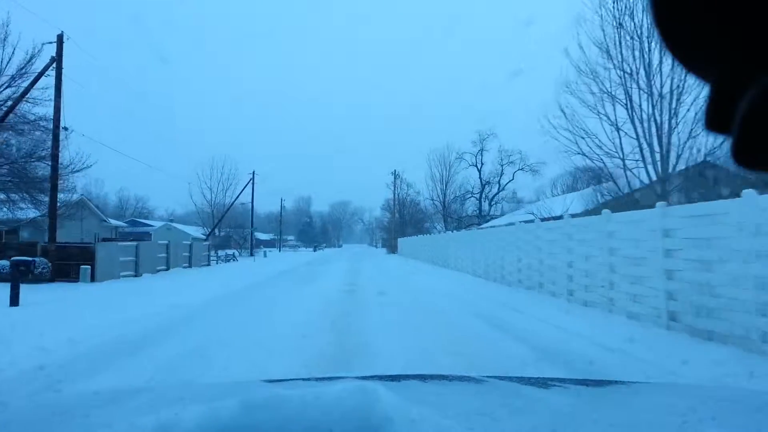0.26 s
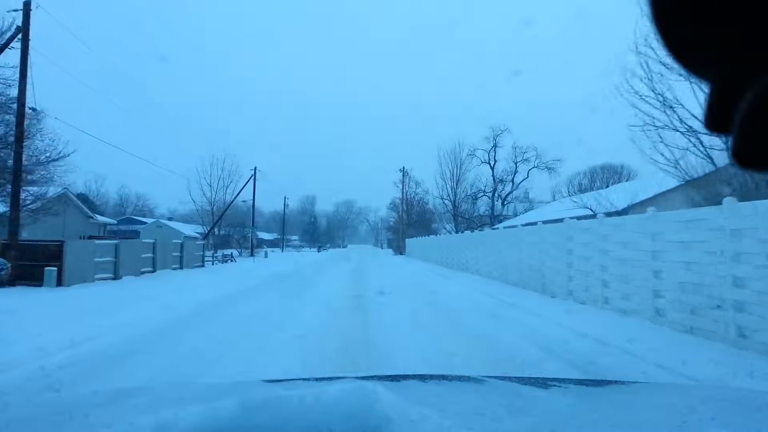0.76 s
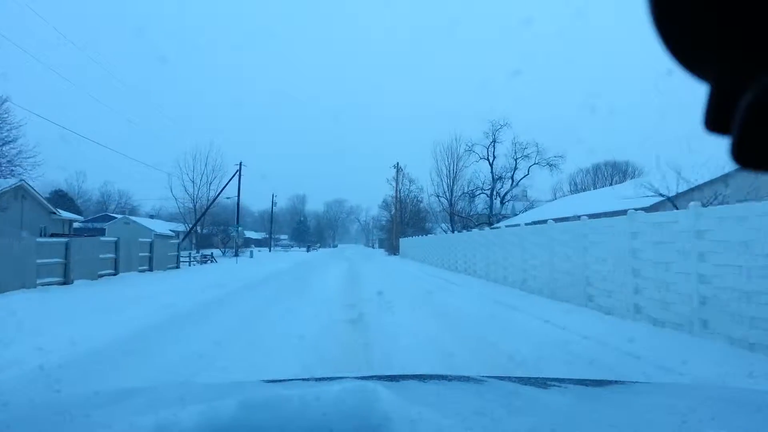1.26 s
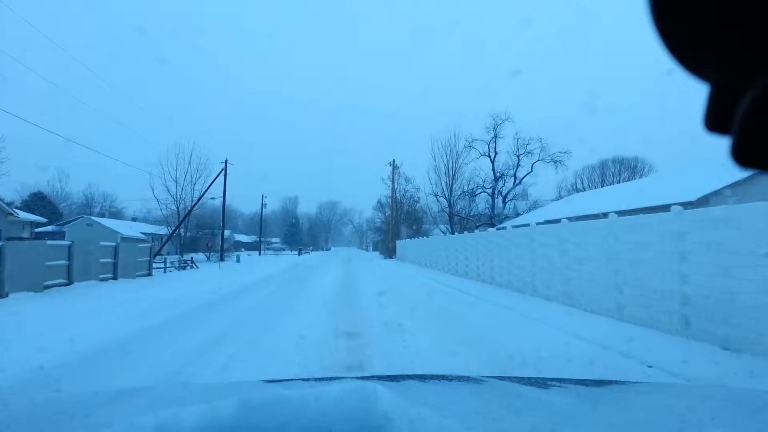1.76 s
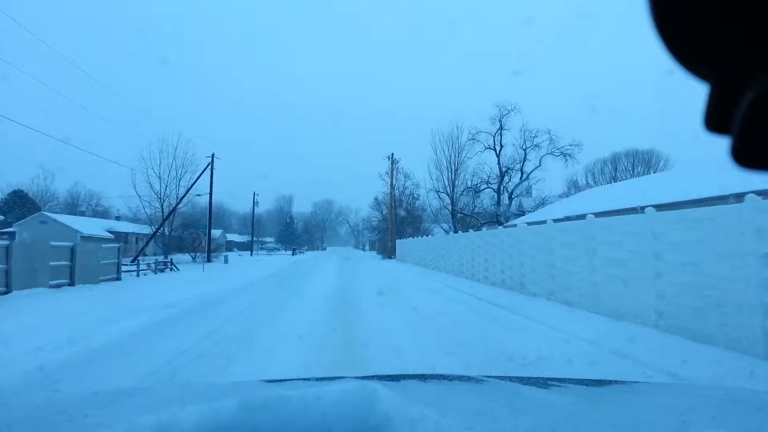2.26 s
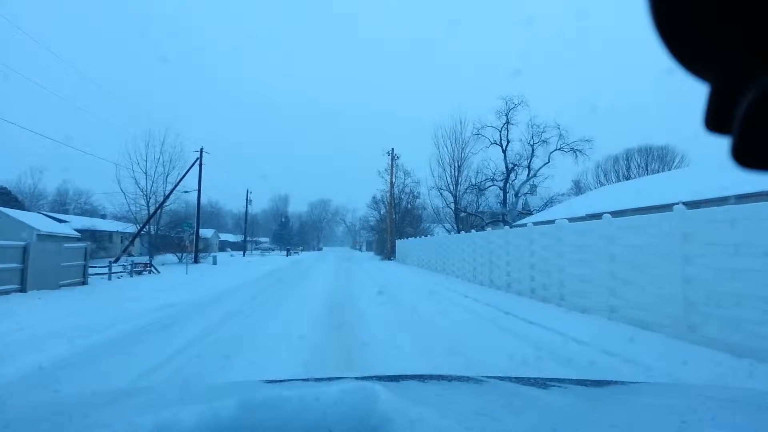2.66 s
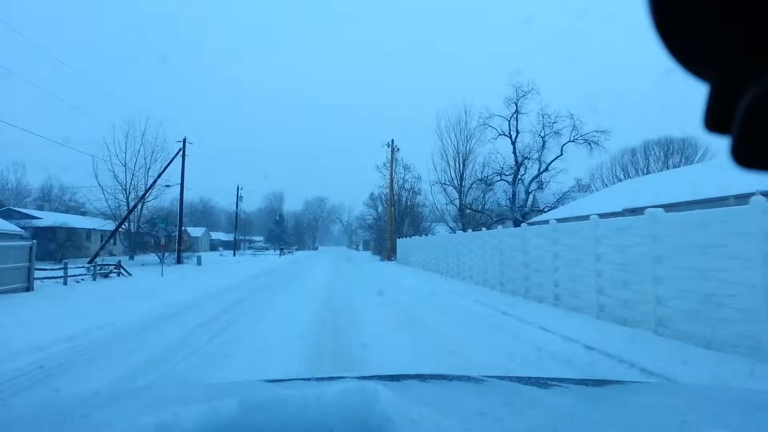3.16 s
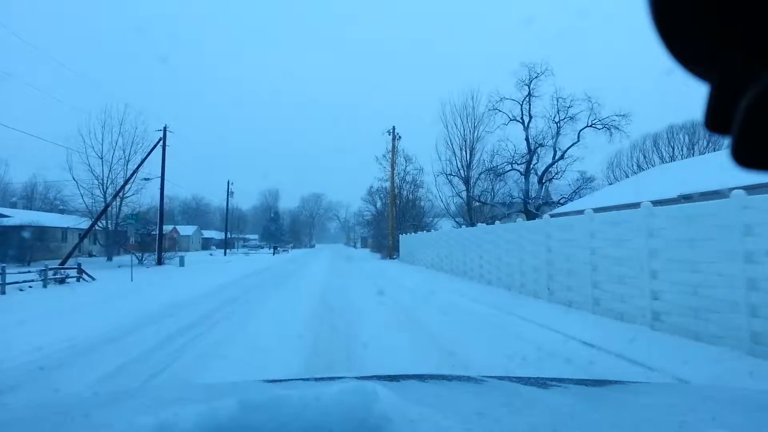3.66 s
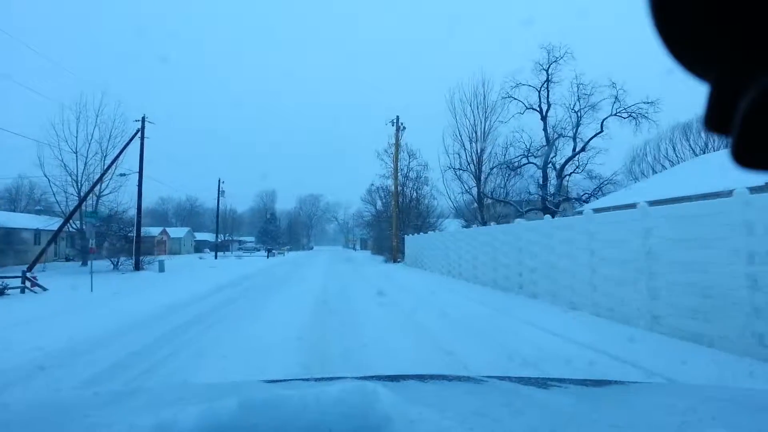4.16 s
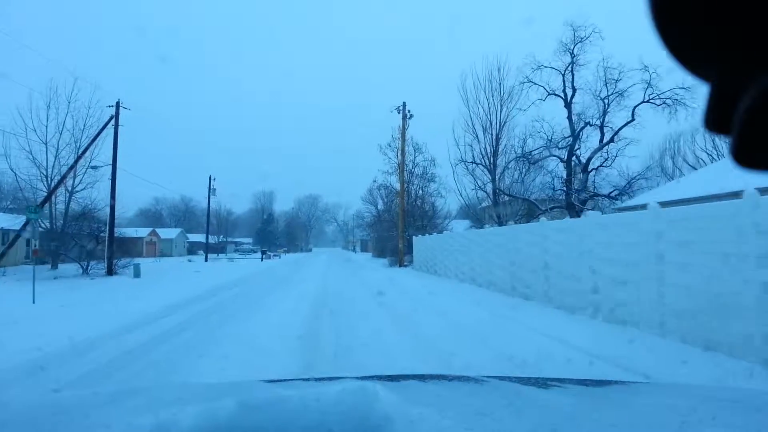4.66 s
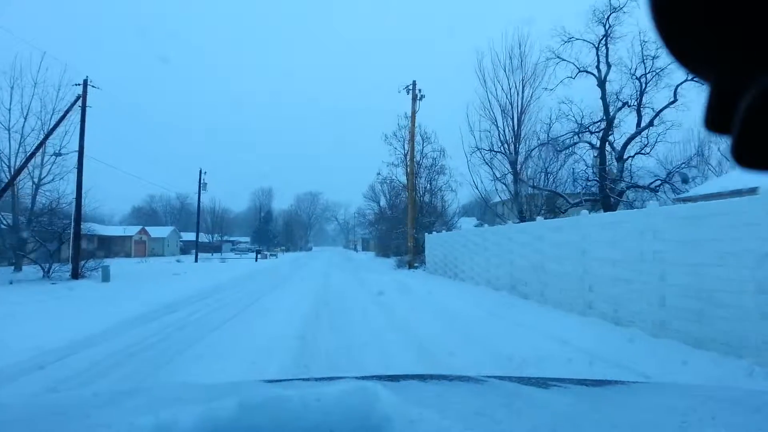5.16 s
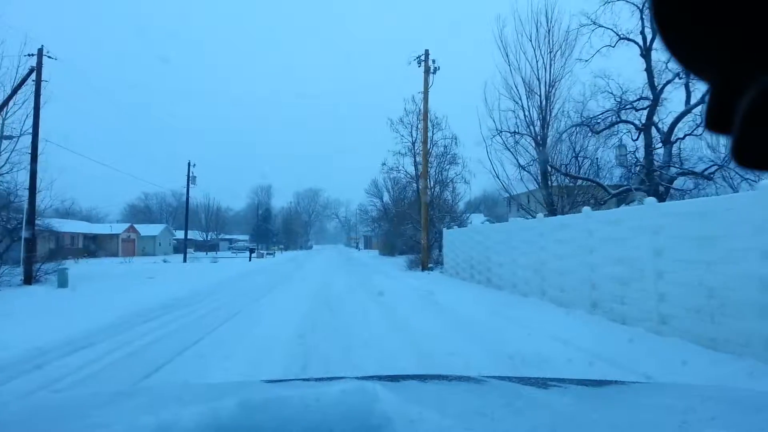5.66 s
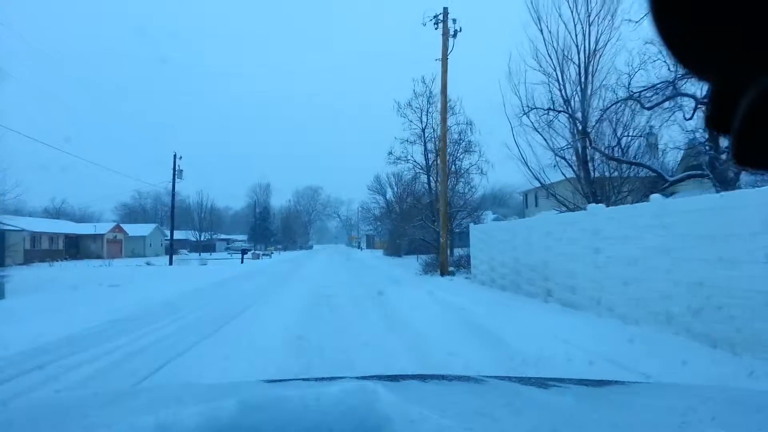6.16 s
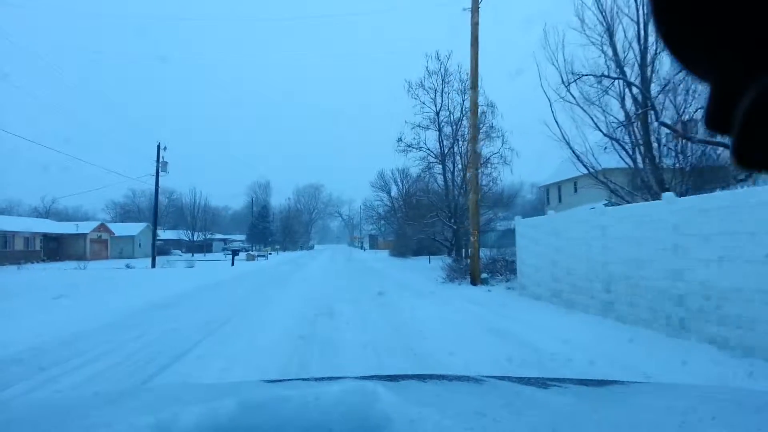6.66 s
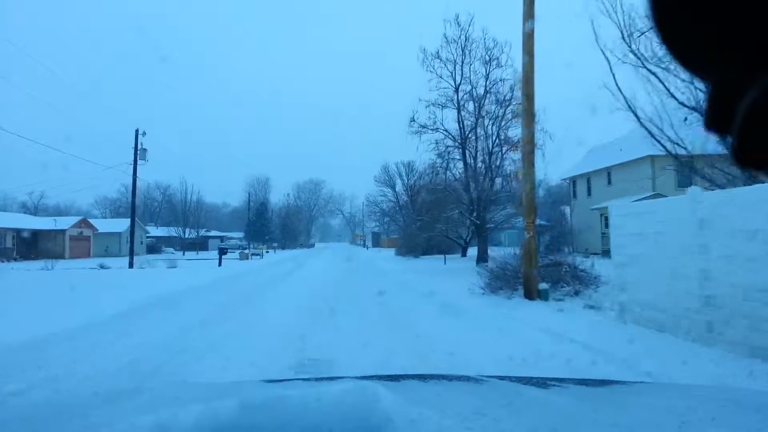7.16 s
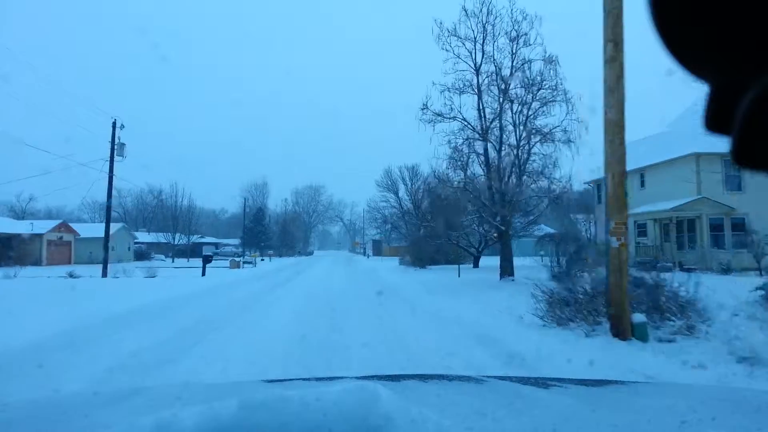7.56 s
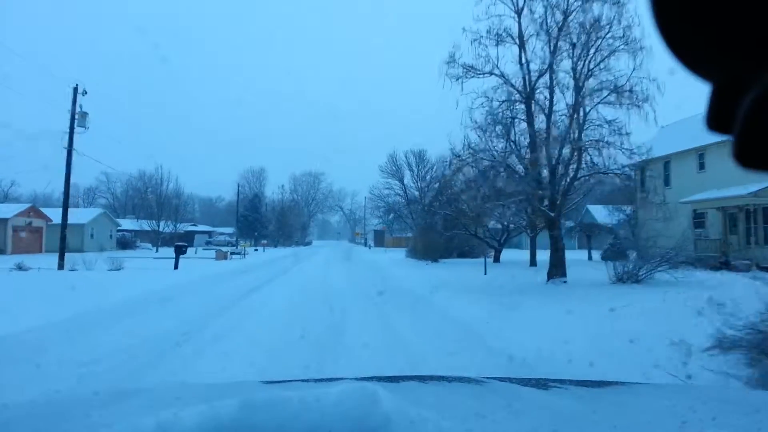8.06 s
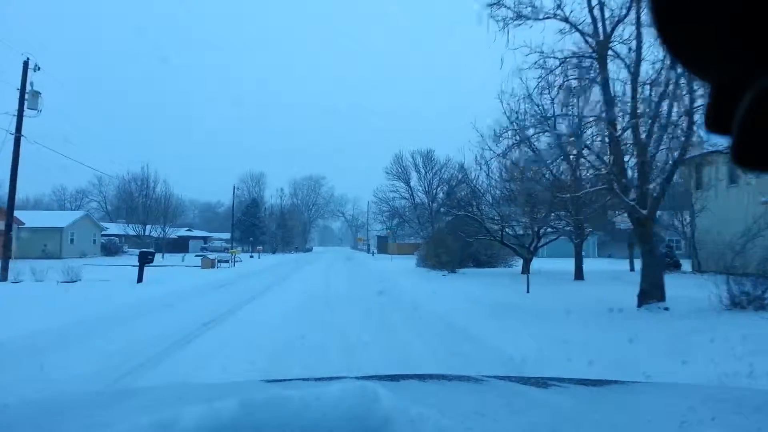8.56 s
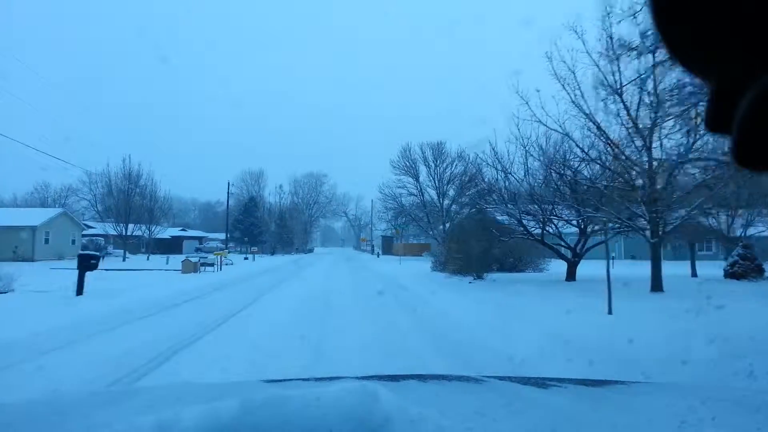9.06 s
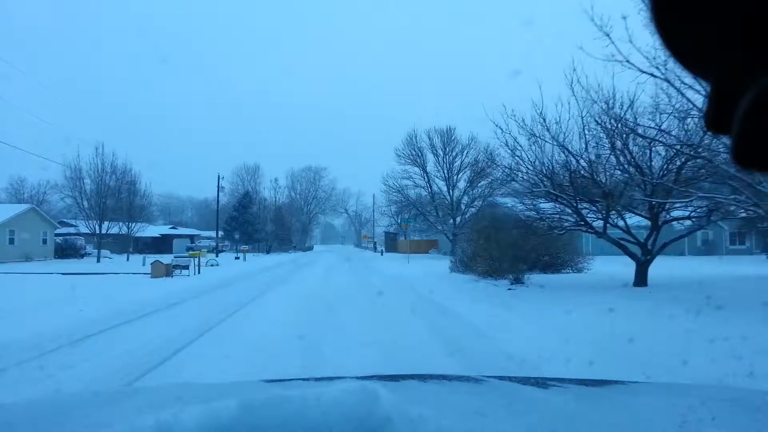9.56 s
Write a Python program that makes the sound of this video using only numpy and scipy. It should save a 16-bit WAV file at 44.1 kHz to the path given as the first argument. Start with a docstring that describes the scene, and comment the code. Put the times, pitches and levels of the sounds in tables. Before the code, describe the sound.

Inside a pickup cab on a snow-covered street, close and boomy. From 0 s a loud open-exhaust V8 throbs low and unevenly, nearly steady for the first second, over packed-snow tyre rumble, mid-range body buzz and faint fan hiss. Between 0.25 and 0.6 s there are ticks, a few panel knocks, and a quick bright scuff and scrape of plastic trim; loose snow sweeps softly near 1 s. The drone then climbs slowly and continuously, its resonances shifting. Near 3 s a rut brings a thud, short squeak, snow swish and a cluster of rattles. Knocks return after 4 s and become dense from 5 to 6 s, with a strong thud at 5.1. Rattling continues less regularly, with thuds near 6.2, 7 and 7.4 s and snow swishes around 7 and 8. Sharp knocks come at 9 s, a last thud at 9.45, then the throttle lifts and the exhaust eases until the end at 9.8 s.

```python
"""Inside the cab of a pickup with an open exhaust on a snowy street, slowly gaining speed after the first second.
A V8 with uneven firing per bank sounds multiples of the engine cycle, lifted at pipe and cab resonances.
Throughout, filtered noise makes tyre rumble, body buzz and fan hiss; decaying modes make the knocks of a loose panel.
From the first half second on come light ticks, a scuff and a scrape of the trim, then sweeps of loose snow;
from the third second a squeak and, over ruts, body thuds. At the end the throttle lifts."""
import sys
import numpy as np
from scipy import signal
from scipy.fft import rfft, irfft
from scipy.io import wavfile

SR = 44100
rng = np.random.default_rng(int(sys.argv[2]) if len(sys.argv) > 2 else 0)


def voltage_ratio(level):
    """Linear amplitude factor for a level in decibels (scalar or array-like)."""
    return 10 ** (np.asarray(level, float) / 20)


def pcm_store(signal):
    """Save signal as 16-bit PCM."""
    levels = np.round(np.clip(np.atleast_2d(signal), -1, 1) * 32767)
    wavfile.write(sys.argv[1], SR, levels.astype(np.int16).T)


N = 431738


def rms_one(x):
    """Scale to unit rms."""
    return x / np.sqrt(np.mean(x ** 2) + 1e-20)


def in_time(rows):
    """Curve of (seconds, value) rows, one value per sample."""
    s, value = np.transpose(rows)
    return np.interp(np.arange(N) / SR, s, value)


def drift(rate_hz):
    """Slow chance of spread 1: coarse noise through a double one-pole low-pass."""
    step, settle = 40, 2000   # samples per coarse value; coarse values dropped
    r = np.exp(-2 * np.pi * rate_hz * step / SR)
    coarse = rng.standard_normal(N // step + settle + 2)
    slow = signal.lfilter([1], [1, -2 * r, r * r], coarse)[settle:]
    return np.interp(np.arange(N) / step, np.arange(len(slow)), rms_one(slow))


def band(x, low_hz, high_hz):
    """Butterworth band-pass."""
    return signal.sosfilt(signal.butter(2, [low_hz, high_hz], "band", fs=SR, output="sos"), x)


def coloured_noise(spectrum, patchy_db, rate_hz):
    """White noise shaped to a spectrum, its level flickering; rms 1."""
    hz, db = np.transpose(spectrum)
    grid_hz = np.maximum(np.fft.rfftfreq(N, 1 / SR), 1)
    shape = voltage_ratio(np.interp(np.log(grid_hz), np.log(hz), db, left=-90, right=-90))
    noise = irfft(rfft(rng.standard_normal(N)) * shape, N)
    return rms_one(noise * voltage_ratio(patchy_db * drift(rate_hz)))


def fan(shake_db):
    """Heater fan: flickering broadband hiss, its level following a third of the shake."""
    # Each row: frequency in Hz, relative density in dB per Hz.
    hiss = [(1500, -28.5), (2000, -7), (3000, -7.5), (3800, -10), (5700, -20.5), (7300, -23), (9500, -25.5),
            (10600, -27.5), (12000, -31), (14600, -30.5), (15200, -56.5)]
    return voltage_ratio(-45 + 0.33 * shake_db) * coloured_noise(hiss, patchy_db=1.43, rate_hz=20)


def tyres(shake_db):
    """Tyres on packed snow: low rumble, its level following part of the shake."""
    # Each row: frequency in Hz, relative density in dB per Hz.
    rumble = [(40, -26), (60, -7), (80, -11.5), (120, -10.5), (160, -8.5), (220, -1), (285, .5),
              (340, -6.5), (420, -8.5), (500, -12.5), (620, -15), (750, -34)]
    return voltage_ratio(-17.5 + 0.4 * shake_db) * coloured_noise(rumble, patchy_db=0.7, rate_hz=31)


def body(shake_db):
    """Body buzz: mid-band noise, its level following the whole shake."""
    # Each row: frequency in Hz, relative density in dB per Hz.
    buzz = [(320, -38), (550, -14), (656, -1.5), (725, -6), (775, -5), (820, 0.5), (870, -1), (915, -4),
            (1010, -7.5), (1350, -12.5), (1600, -16), (1850, -19), (2600, -28), (3380, -60)]
    return voltage_ratio(-30 + shake_db) * coloured_noise(buzz, patchy_db=1.5, rate_hz=39)


def snow():
    """Loose snow sweeps along the floor pan: soft Gaussian swells of bright, patchy noise."""
    # Each row: centre in seconds, level in dB rms before the patchiness, half-length (to 1/e) in seconds.
    sweeps = [(1.055, -54, 0.23), (2.92, -51.5, 0.044), (3.36, -54.5, 0.16), (7.098, -53.5, 0.073),
              (7.97, -49.5, 0.046)]
    t = np.arange(N) / SR
    swell = sum(voltage_ratio(db) * np.exp(-((t - s) / half_s) ** 2) for s, db, half_s in sweeps)
    return swell * voltage_ratio(2.0 * drift(40)) * rms_one(band(rng.standard_normal(N), 2000, 8000))


def rub(s, db, hold_s, t60_s):
    """Envelope of a rub: fast attack up to s, hold, exponential release."""
    attack_db_per_s = 8000
    t = np.arange(N) / SR - s
    rise_db = attack_db_per_s * np.maximum(-t, 0)
    fall_db = 60 * np.maximum(t - hold_s, 0) / t60_s
    return voltage_ratio(db - np.minimum(rise_db + fall_db, 200))


def rubbing(scuff_top_db, grain_db):
    """Something brushes the trim: grainy noise with lingering treble; later a short sine squeak wavers."""
    # Each: time of full level in seconds, level in dB rms, hold in seconds, release t60 in seconds.
    scuff_row = (.4345, -32, .008, .06)
    squeak_row = (2.977, -25, .009, .06)
    squeak_hz, squeak_waver = 1045, 0.02
    white = rng.standard_normal((2, N))
    s, db, hold_s, t60_s = scuff_row
    scuff = rub(*scuff_row) * voltage_ratio(grain_db * drift(150)) * rms_one(band(white[0], 2100, 4000))
    scuff_top = rub(s, db + scuff_top_db, hold_s, 2.8 * t60_s) * rms_one(band(white[1], 5000, 13000))
    angle = 2 * np.pi * np.cumsum(squeak_hz * (1 + squeak_waver * drift(30))) / SR
    return scuff + scuff_top + rub(*squeak_row) * np.sqrt(2) * np.sin(angle)


def catches():
    """Something scrapes the trim in a quick run of catches, each ringing as a decaying sine."""
    # Each row: start in seconds, starting level in dB, frequency in Hz.
    catch_rows = [(.4337, -20.5, 3920), (0.436, -18.5, 2900), (.4375, -18, 2980), (.4407, -20, 4340),
                  (0.445, -27, 3230)]
    t60_s = 0.007
    out, t = np.zeros(N), np.arange(SR // 50) / SR
    for s, db, hz in catch_rows:
        i = int(s * SR)
        out[i:i + len(t)] += voltage_ratio(db - 60 * t / t60_s) * np.sin(2 * np.pi * hz * t)
    return out


def trim(gain_db, vary_db, rise_share):
    """Light plastic ticks: each rings the trim's modes anew and adds a short bright snap."""
    # Each row: start in seconds, level in dB before gain_db, snap in dB against that level.
    ticks = [(0.2497, -38.5, -2.5), (0.2828, -39, -34.5), (0.4065, -38, -15.5), (2.899, -31, -32.5),
             (2.9215, -39.5, -32), (2.9352, -29.5, -38), (2.9868, -33, -30), (3.119, -41, -30),
             (3.3285, -31.5, -34.5), (3.338, -37, -30.5), (3.4098, -36, -23), (3.5136, -35, -19.5),
             (4.0997, -39, -11), (4.5022, -36.5, -26), (4.793, -45.5, 2.5), (4.94, -36, -31),
             (5.0498, -38, -28), (5.178, -47, 4.5), (5.2526, -33.5, -38), (7.7862, -51, 1.5),
             (7.7978, -31, -26.5), (7.919, -46, -4), (7.9383, -32.5, -28), (7.9807, -34.5, -33),
             (8.137, -34.5, -36), (8.159, -42, -17), (8.17, -30.5, -29), (8.3272, -35, -35.5),
             (8.724, -51.5, 2.5), (8.9114, -48, -2.5), (8.9705, -32.5, -27), (9.03, -34, -39.5),
             (9.35, -40.5, -7)]
    # Modes of the trim. Each row: frequency in Hz, level in dB, t60 in seconds.
    modes = [(2900, -6, 0.0098), (4030, 2, 0.0074), (4800, -1.5, 0.0071), (5530, -5.5, 0.0065),
             (7150, -12.5, 0.0065)]
    snap_t60_s, detune = 0.015, 0.026
    chance = rng.standard_normal((len(ticks), len(modes)))
    out, t = np.zeros(N), np.arange(SR // 20) / SR
    rise = 1 - np.exp(-t / (rise_share * snap_t60_s))
    bright = rms_one(band(rng.standard_normal(N), 6500, 14500))
    for (s, tick_db, snap_db), chances in zip(ticks, chance):
        i = int(s * SR)
        ring = 0
        for (hz, db, t60_s), c in zip(modes, chances):
            decay = voltage_ratio(db + vary_db * c - 60 * t / t60_s)
            ring = ring + decay * np.sin(2 * np.pi * hz * (1 + detune * c) * t)
        snap = voltage_ratio(snap_db - 60 * t / snap_t60_s) * bright[i:i + len(t)]
        out[i:i + len(t)] += voltage_ratio(tick_db + gain_db) * rise * (ring + snap)
    return out


def panel(small_db, per_s, spread_db, vary_db, soft_hz, travel_s):
    """A loose panel: loud knocks at set times, small ones by chance, each striking the modes anew."""
    # Each row: start in seconds, strike level in dB, hardness as dB change of the modes above 1 kHz.
    knocks = [(0.2506, -8.5, 5), (0.3858, -17, -1), (0.4074, -8.5, -3), (0.4922, -17, 2),
              (0.615, -10.5, 3.5), (2.9241, -20, 9), (2.9361, -12, 1), (2.9946, -16, 0), (3.0279, -10, -3),
              (3.0744, -15, 1), (3.2878, -19, 5), (3.3022, -13.5, 4), (3.3444, -10, -2), (3.3571, -14, 0),
              (3.4043, -13, 3), (3.4178, -18, 3), (3.4257, -7.5, -9), (3.4747, -12, -8), (4.0392, -12, 6.5),
              (4.1003, -15, 2), (4.2724, -15.5, 4), (4.4441, -12.5, 3), (4.5032, -10, -1),
              (4.7154, -13, -1), (4.7315, -14, 2), (4.885, -14, 5.5), (4.9273, -9, -1), (4.9432, -6, -0.5),
              (4.9493, -20, 4), (5.013, -15, 3), (5.02, -11, -2), (5.0503, -8, 3), (5.1043, -8.5, 1),
              (5.1253, -13, -3), (5.1307, -5.5, -6), (5.1564, -13, -5), (5.1852, -13, -10),
              (5.2068, -9.5, -3), (5.2525, -9, -11), (5.2814, -8, -4), (5.3103, -9, -15), (5.3375, -9, 3),
              (5.3644, -9, 0), (5.4449, -10, 6.5), (5.4611, -16, 5), (5.5397, -8, 0), (5.566, -20, 10),
              (5.581, -10, 1.5), (5.6283, -10, -2), (5.6478, -13, -5), (5.6615, -21, 9), (5.6907, -11, -8),
              (5.713, -14, -1), (5.7385, -13, -3), (5.7797, -11, -8), (5.8053, -9, -2), (5.8317, -9, -2),
              (5.8423, -18, 6), (5.8601, -11, -4), (5.9244, -10.5, 0), (6.0428, -17, 4), (6.0799, -13, -7),
              (6.1336, -12, -8), (6.1672, -20, 6), (6.1822, -15, 3), (6.2543, -14, -2), (6.279, -8, -5),
              (6.293, -8, -8), (6.5678, -10.5, -2), (6.7022, -11, -5), (6.7431, -17, 6), (6.7574, -16, 4),
              (6.7722, -11.5, 1), (6.8574, -12, -7), (6.9552, -11, 0), (6.971, -18, 5), (7.0045, -9, -1),
              (7.0849, -23, 7), (7.118, -15, 2), (7.1827, -16.5, 9), (7.2166, -10, -7), (7.246, -13, -10),
              (7.2818, -13.5, 4.5), (7.2965, -16, 1), (7.4779, -13, -1), (7.5249, -11.5, 1),
              (7.6216, -17, 8.5), (7.654, -14, -1), (7.7009, -15, 3), (7.7346, -13, -1), (7.7687, -17, 2),
              (7.7828, -10, -4), (7.8124, -21, 8), (7.8597, -12.5, 2.5), (7.9419, -17, 1), (7.9552, -10, 0),
              (7.9731, -11, -4), (8.0177, -17, -7), (8.0329, -18.5, 14), (8.0999, -7.5, 1),
              (8.3301, -15, 4), (8.4884, -16, 2), (8.5205, -15, -4), (8.5343, -22, 7), (8.543, -11, -6),
              (8.6793, -16, 3), (8.7117, -13.5, 3), (8.865, -13, -4), (8.9715, -7.5, -5), (9.0311, -5.5, 4),
              (9.0712, -12.5, 6), (9.1185, -9, -1), (9.2874, -10.5, 4), (9.314, -13, -14),
              (9.3511, -8, 2.5), (9.3966, -10.5, 2)]
    # Modes of the panel. Each row: frequency in Hz, level in dB, t60 in seconds.
    modes = [(590, -16, 0.0071), (810, -2.5, 0.025), (1190, -21.5, 0.0047), (1342, -13, 0.01),
             (1790, -12, 0.0079), (2280, -17.5, 0.0025)]
    small = rng.random(N) < per_s / SR
    low = small * voltage_ratio(small_db + spread_db * np.minimum(rng.exponential(1, N), 3))
    high = low.copy()
    at_s, strike_db, hard_db = np.transpose(knocks)
    start = (at_s * SR).astype(int)
    low[start] = voltage_ratio(strike_db)
    high[start] = voltage_ratio(strike_db + hard_db)
    block = 64   # mode strengths are redrawn every 1.5 ms
    out, strengths = 0, rng.standard_normal((len(modes), N // block + 1))
    for k, (hz, db, t60_s) in enumerate(modes):
        r, w = voltage_ratio(-60 / (t60_s * SR)), 2 * np.pi * hz / SR
        gain = np.repeat(voltage_ratio(db + vary_db * strengths[k]), block)[:N]
        lag = int(travel_s * 1000 / hz * SR)   # bending waves: the lows arrive later
        strike = (-1) ** k * np.roll((high if hz > 1000 else low) * gain, lag)
        # the tiny offset keeps the filter out of denormals
        out = out + signal.lfilter([0, np.sin(w)], [1, -2 * r * np.cos(w), r * r], strike + 1e-18)
    # padded contact: the blow carries little treble
    return signal.sosfilt(signal.butter(3, soft_hz, fs=SR, output="sos"), out)


def thuds():
    """The body booms as a wheel meets a rut: a sine with a soft rise and exponential decay."""
    # Each row: start in seconds, level in dB before the rise and decay, frequency in Hz.
    ruts = [(2.949, -6.5, 275.3), (5.099, -5.5, 274.6), (6.248, -10, 251.5), (7.021, -9, 314),
            (7.351, -15, 283.5), (9.449, -7.5, 297.6)]
    rise_s, t60_s = 0.028, 0.39
    out, t = np.zeros(N + SR), np.arange(SR // 2) / SR
    shape = (1 - np.exp(-t / rise_s)) * voltage_ratio(-60 * t / t60_s)
    for s, db, hz in ruts:
        i = int(s * SR)
        out[i:i + len(t)] += voltage_ratio(db) * shape * np.sin(2 * np.pi * hz * t)
    return out[:N]


def crank(wander_rad):
    """Engine speed in rpm, cycle rate in Hz and slightly wandering cycle angle; a cycle takes two turns."""
    # Each row: time in seconds, engine speed in turns per minute.
    speed = [(0.0, 1714), (0.2, 1687), (0.8, 1706), (1.7, 1862), (2.6, 1979), (3.5, 2080), (4.4, 2175),
             (5.6, 2293), (6.8, 2412), (7.4, 2460), (7.7, 2506), (8.3, 2560), (8.6, 2573), (9.5, 2652),
             (9.79, 2602)]
    rpm = in_time(speed)
    cycle_hz = rpm / 120
    angle = 2 * np.pi * np.cumsum(cycle_hz) / SR + wander_rad * drift(1.1)
    return rpm, cycle_hz, angle


def tone(order, angle, db, waver_db):
    """One multiple of the cycle; no two cycles burn alike, so its level wavers."""
    return voltage_ratio(db + waver_db * drift(5.9)) * np.sin(order * angle + rng.uniform(0, 2 * np.pi))


def booms(cycle_hz, angle, lifted, closing):
    """Low multiples of the cycle, coloured by the cab; order 8 is the firing rate."""
    # Each row: multiple of the cycle, level in dB rms before colour, share of the cab's colour,
    # change in dB on lifting the throttle.
    boom_rows = [(3, -45, 0.1, 27.5), (4, -39, 0.1, 12), (5, -12, 0.93, -7), (8, -11, 1.0, -10),
                 (10, -23, 0.085, 1.5)]
    # How the cab answers a low tone. Each row: frequency in Hz, gain in dB.
    cab = [(44, -42), (66, -23), (70, -1), (78, -0.5), (83.4, 1), (87, -4), (94, -7.5), (104, -9),
           (110, -11), (114, -16.5), (122, -17.5), (150, -15.5), (158, -8.5), (163, -4.5), (167, 2),
           (177, -2.5), (220, 2)]
    cab_hz, cab_gain_db = np.transpose(cab)
    out = 0
    for order, db, share, lift_db in boom_rows:
        colour_db = share * np.interp(order * cycle_hz, cab_hz, cab_gain_db)
        change_db = lift_db * (lifted if lift_db > 0 else closing)
        out = out + tone(order, angle, db + colour_db + change_db, waver_db=0.54)
    return out


def belt(cycle_hz, angle):
    """Whine of a belt-driven part, lifted where the dash resonates."""
    order = 33.5
    dash_hz, dash_width_hz, dash_db = 545.5, 20, 11.5
    dash = np.exp(-((order * cycle_hz - dash_hz) / dash_width_hz) ** 2)
    return tone(order, angle, -41 + dash_db * dash, waver_db=2.0)


def pipe(x):
    """Pipe and cab resonances: two-pole band-passes in parallel, signs alternating."""
    # Each row: frequency in Hz, width in Hz, gain in dB.
    resonances = [(75.3, 12.8, -23.5), (104, 18, -32), (163.8, 8.2, -2), (236, 20.8, -18.5),
                  (274.6, 69, -25), (329.6, 10.5, -1.6), (352.7, 34.5, -7), (372.7, 55.6, -10),
                  (415, 17.5, -8), (453.4, 10.3, -12.5), (470.7, 30.6, -12.5), (512.3, 17.2, -15.5)]
    out = 0
    for k, (hz, width_hz, db) in enumerate(resonances):
        r = np.exp(-np.pi * width_hz / SR)
        b = (1 - r * r) / 2 * np.array([1, 0, -1])
        a = [1, -2 * r * np.cos(2 * np.pi * hz / SR), r * r]
        out = out + (-1) ** k * voltage_ratio(db) * signal.lfilter(b, a, x)
    return out


def exhaust(waver_db, wander_rad):
    """V8 engine: low booms, higher multiples of the cycle through the pipe, and belt whine."""
    speeds_rpm = [1700, 2000, 2300, 2650]   # engine speeds in rpm at which levels are given
    # Each row: multiple of the cycle, then level in dB rms into the pipe at each of those speeds.
    multiples = [(6, 1, -1.5, -9.5, -25.5), (7, 7, -21.5, -15, -20), (9, -25, -21.5, -28.5, -32),
                 (11, -19, -25, -16.5, -9.5), (12, -41.5, -18, -7.5, -1.5), (13, -21, -5.5, 1, -2.5),
                 (14, -16.5, -3, -5.5, -14.5), (15, -5, -11, -4.5, -33), (16, -0.5, -9, -12, -23.5),
                 (17, -14, -20, -24, -12.5), (19, -11, -24, -9.5, -33), (20, -18, -30.5, -28.5, -16.5),
                 (21, -22.5, -15.5, -20.5, -4.5), (22, -22, -15.5, -21.5, -22), (23, -39, -27, -3.5, -24),
                 (24, -25, -15.5, -8, -16.5), (25, -15, -14.5, -22.5, -16.5), (26, -16.5, -10.5, -29, -1),
                 (27, -18.5, -19, -26.5, -18.5), (28, -28.5, -40.5, -6.5, -23),
                 (29, -20.5, -27.5, -19, -13), (30, -17, -28.5, -18, -19.5), (32, -19, -33.5, -14, -14.5),
                 (33, -17.5, -27, -26, -29)]
    lift_s, lift_lasts_s, pipe_lift_db = 9.54, 0.14, -12
    rpm, cycle_hz, angle = crank(wander_rad)
    lifted = np.clip((np.arange(N) / SR - lift_s) / lift_lasts_s, 0, 1)
    closing = lifted ** 3   # loaded tones hold until the throttle is nearly shut
    into_pipe = sum(tone(order, angle, np.interp(rpm, speeds_rpm, dbs), waver_db)
                    for order, *dbs in multiples)
    others = pipe(into_pipe) * voltage_ratio(pipe_lift_db * closing)
    # sqrt(2): the sines' levels are rms
    return np.sqrt(2) * (booms(cycle_hz, angle, lifted, closing) + others + belt(cycle_hz, angle))


def scene():
    """Fan, road, rattles and engine at one microphone."""
    # How hard the packed snow shakes the truck. Each row: time in seconds, shake in dB.
    shake = [(0.0, -2.5), (2.3, -2), (2.86, -2), (2.96, 2), (3.1, -2), (3.26, 0), (3.35, 2.5), (3.48, 1),
             (3.7, -1), (4.7, -0.5), (5.15, 3), (5.4, 2), (5.8, 4), (6.2, 2.5), (6.85, 2), (7.1, 3),
             (7.5, 1), (9.3, 1.5), (9.52, 0), (9.79, 1.3)]
    shake_db = in_time(shake)
    road = tyres(shake_db) + body(shake_db)
    # what makes the body buzz also shakes the panel
    knocks = panel(-27.0 + 2.0 * shake_db, per_s=55, spread_db=1.0, vary_db=1.5,
                   soft_hz=2400, travel_s=0.0012)
    ticks = trim(gain_db=8.0, vary_db=1.0, rise_share=0.043)
    rubs = rubbing(scuff_top_db=-7.5, grain_db=-4.5) + catches()
    engine = exhaust(waver_db=1.13, wander_rad=0.0042)
    return (fan(shake_db) + road + snow() + rubs + ticks + knocks + thuds() + engine)[None]


def roll_off(x):
    """The treble ends steeply here."""
    return signal.sosfilt(signal.butter(12, 14830, fs=SR, output="sos"), x)


def record(dry):
    """The loudest peaks overload the input; the deepest bass is cut."""
    clipped = np.clip(dry, -0.99, 0.99)
    mix = signal.sosfilt(signal.butter(2, 45, "high", fs=SR, output="sos"), clipped)
    return roll_off(mix)


dry = scene()
out = record(dry)
pcm_store(out)
```